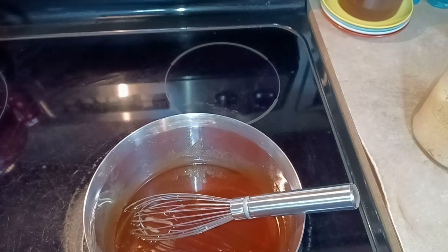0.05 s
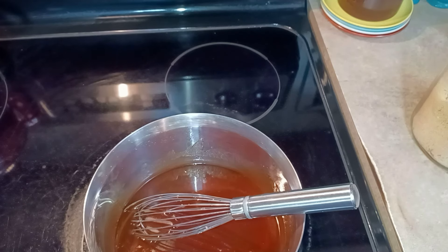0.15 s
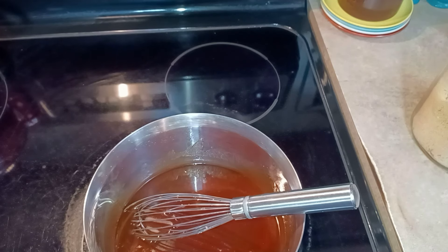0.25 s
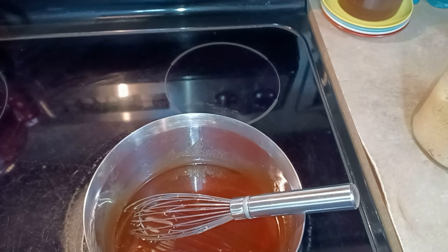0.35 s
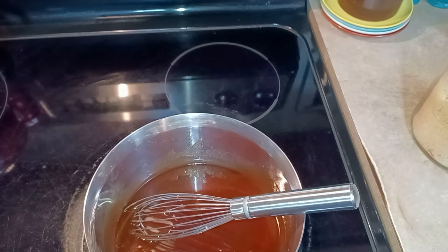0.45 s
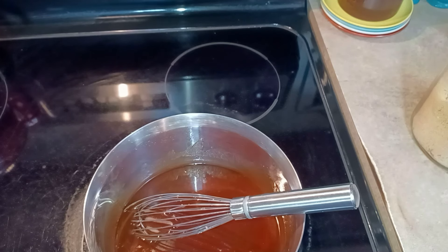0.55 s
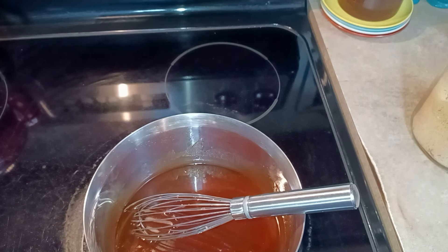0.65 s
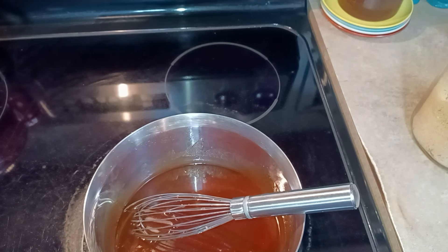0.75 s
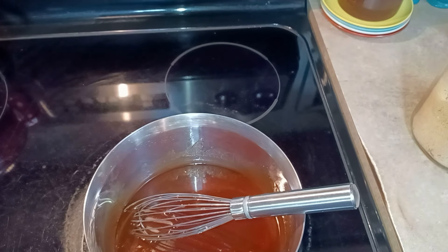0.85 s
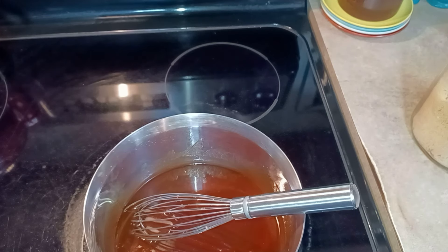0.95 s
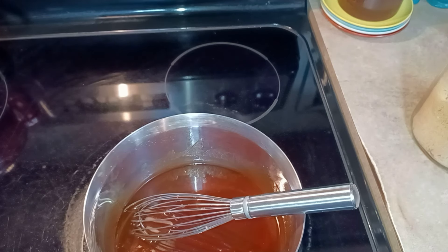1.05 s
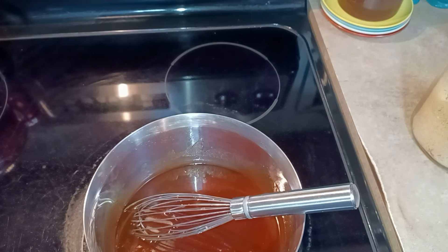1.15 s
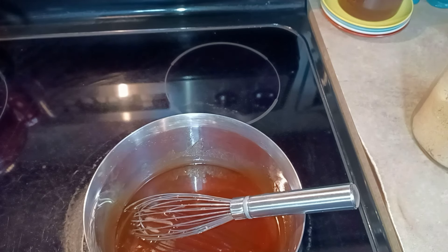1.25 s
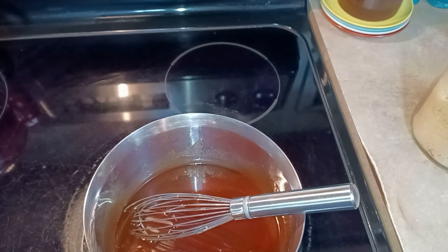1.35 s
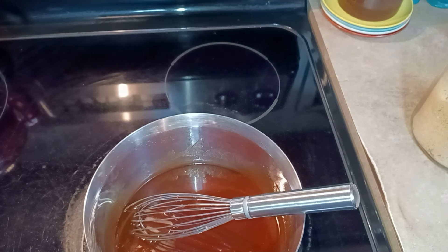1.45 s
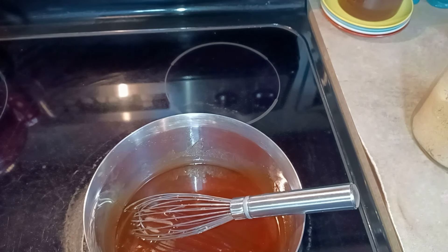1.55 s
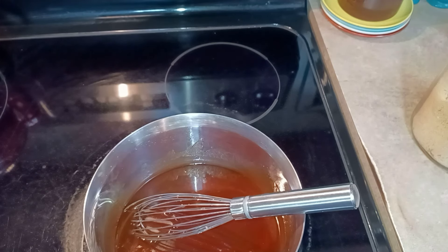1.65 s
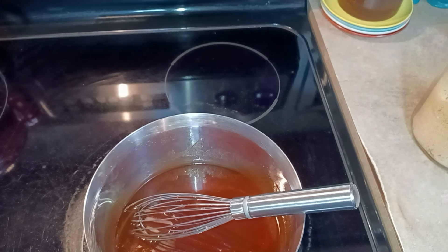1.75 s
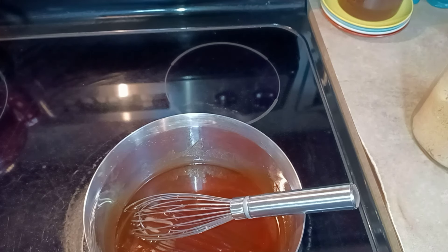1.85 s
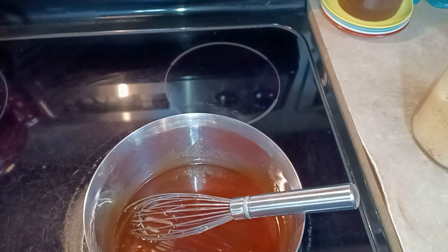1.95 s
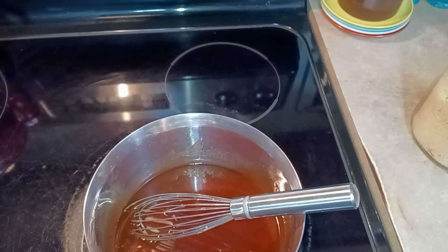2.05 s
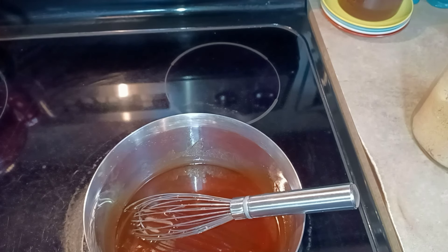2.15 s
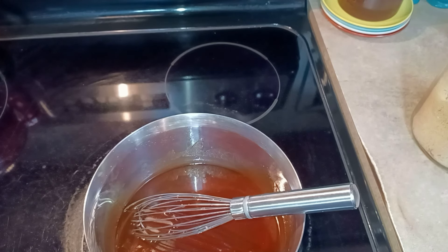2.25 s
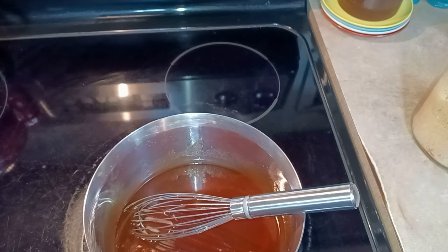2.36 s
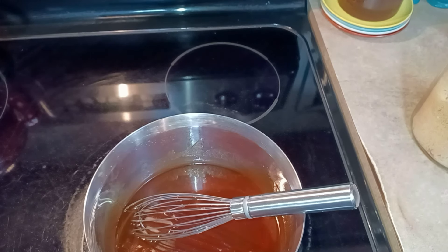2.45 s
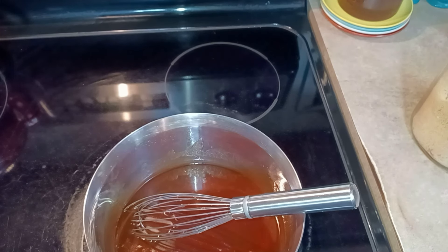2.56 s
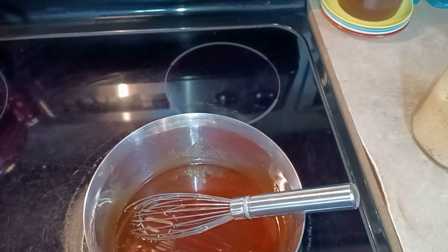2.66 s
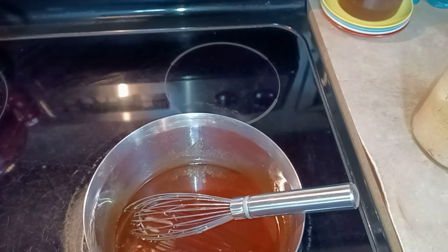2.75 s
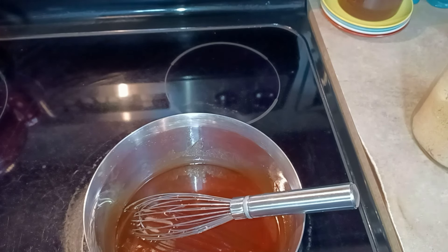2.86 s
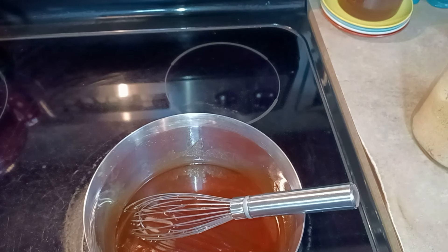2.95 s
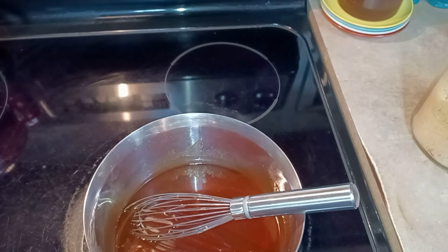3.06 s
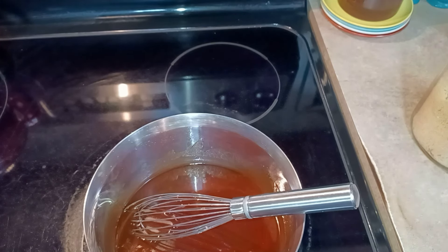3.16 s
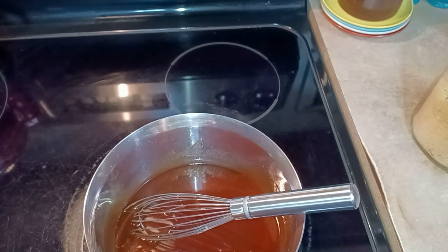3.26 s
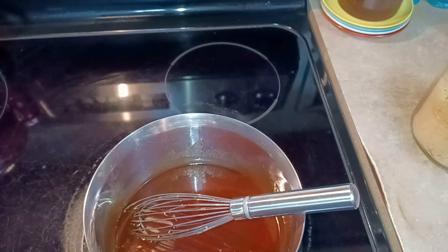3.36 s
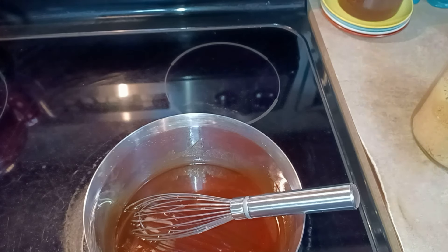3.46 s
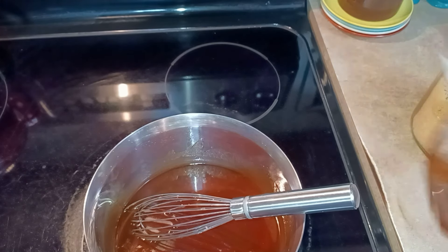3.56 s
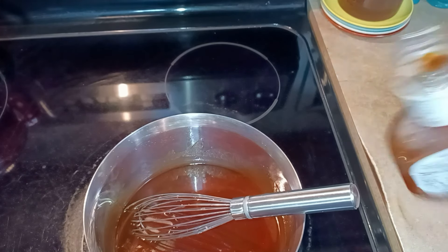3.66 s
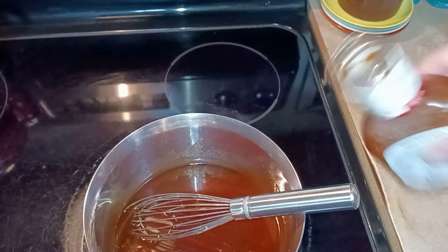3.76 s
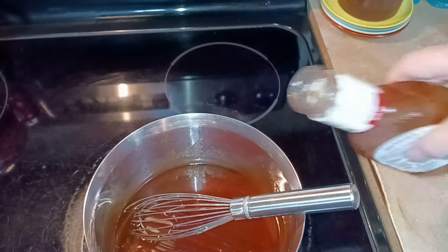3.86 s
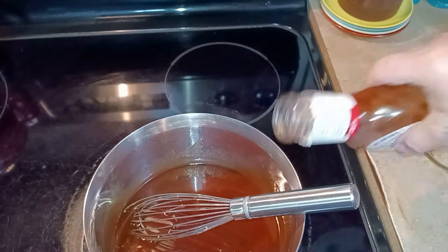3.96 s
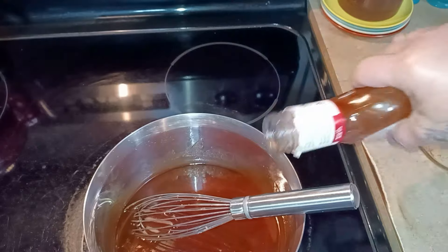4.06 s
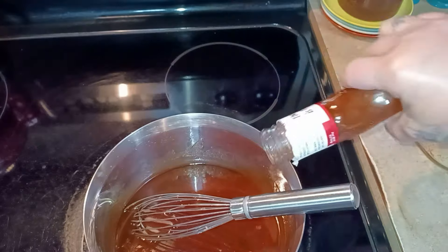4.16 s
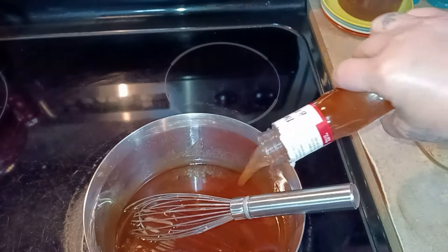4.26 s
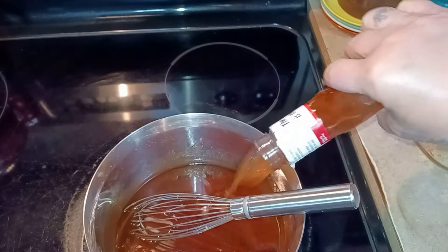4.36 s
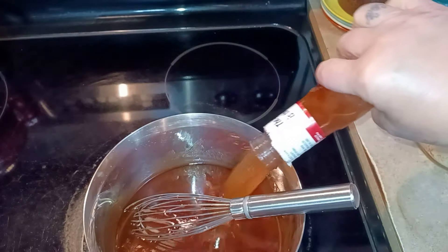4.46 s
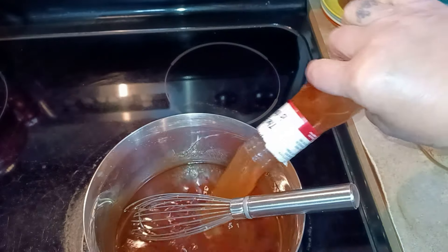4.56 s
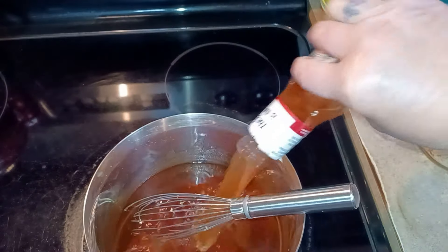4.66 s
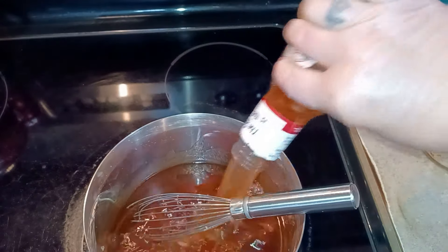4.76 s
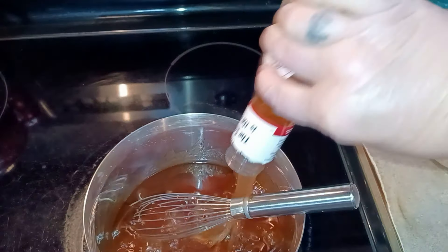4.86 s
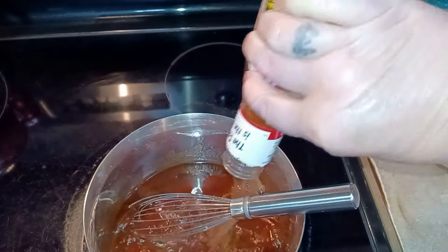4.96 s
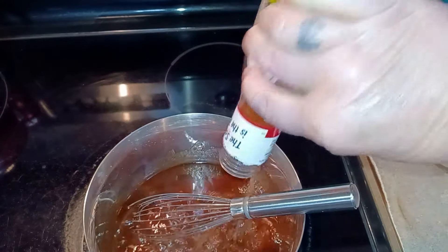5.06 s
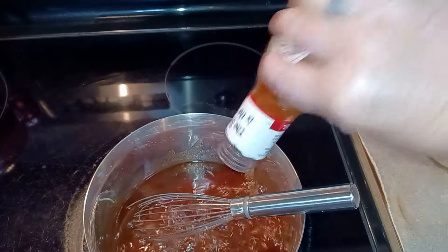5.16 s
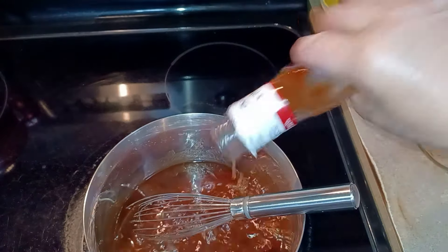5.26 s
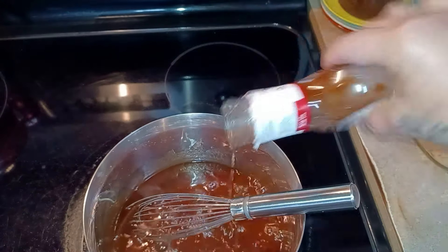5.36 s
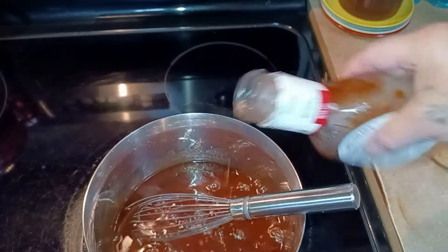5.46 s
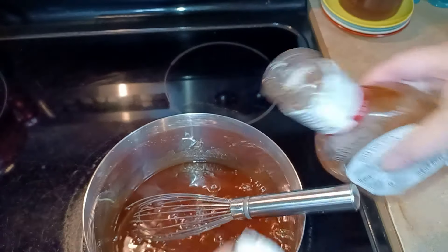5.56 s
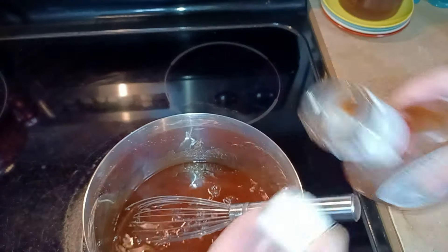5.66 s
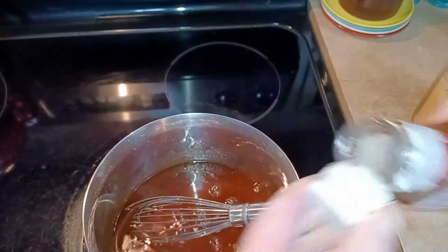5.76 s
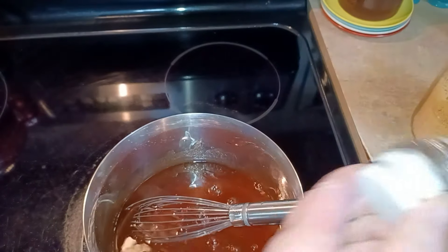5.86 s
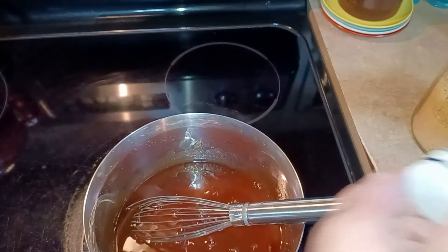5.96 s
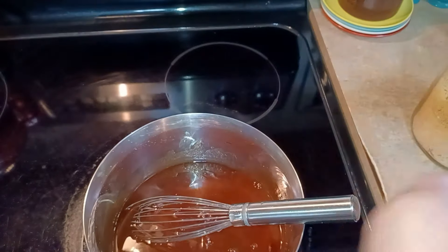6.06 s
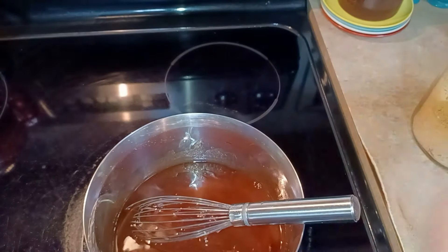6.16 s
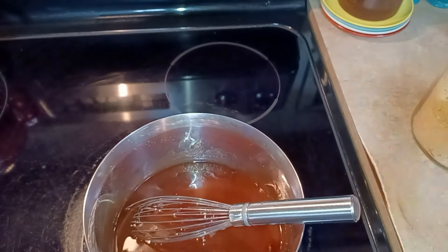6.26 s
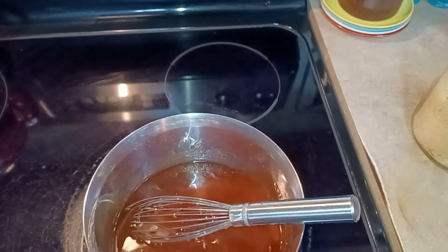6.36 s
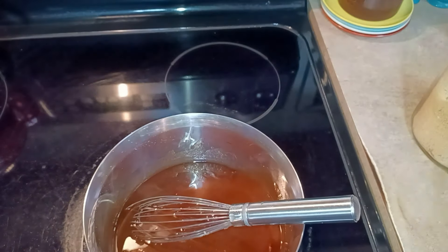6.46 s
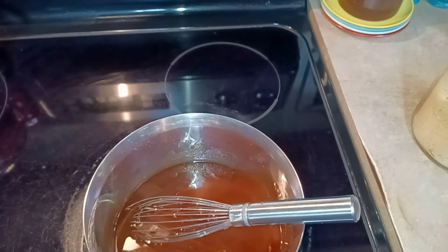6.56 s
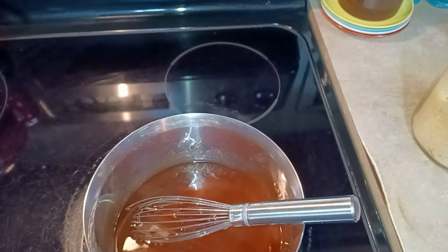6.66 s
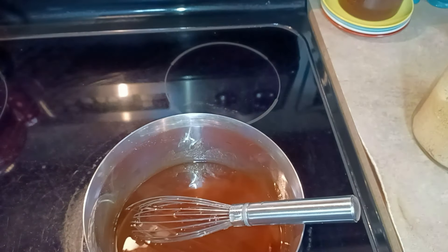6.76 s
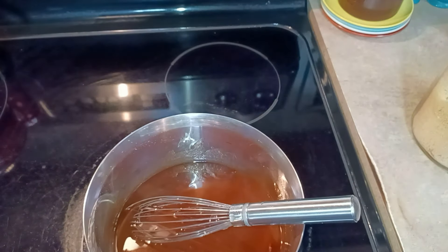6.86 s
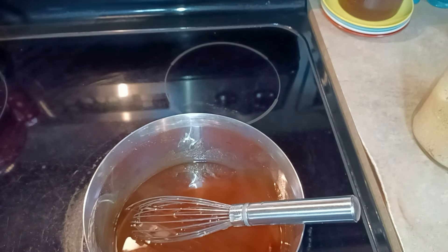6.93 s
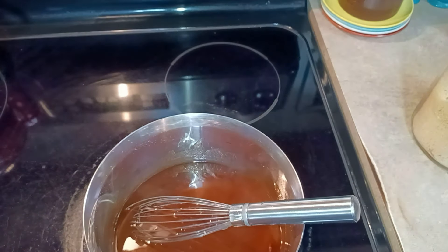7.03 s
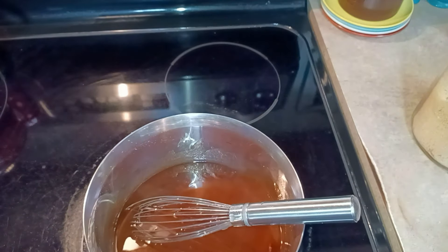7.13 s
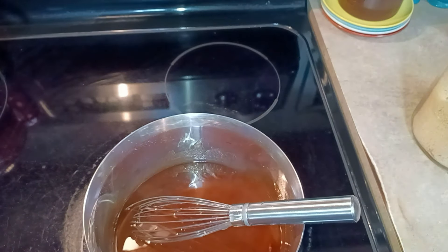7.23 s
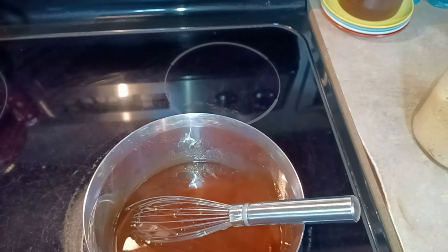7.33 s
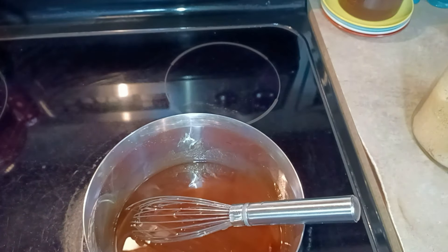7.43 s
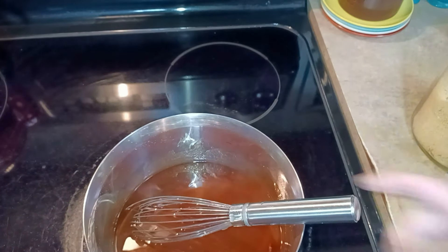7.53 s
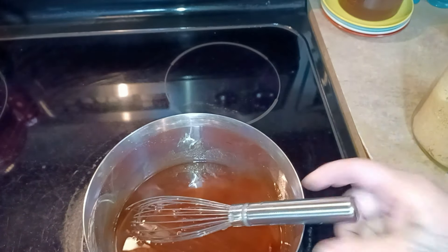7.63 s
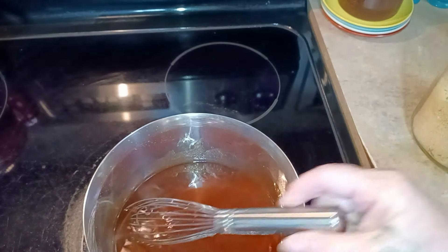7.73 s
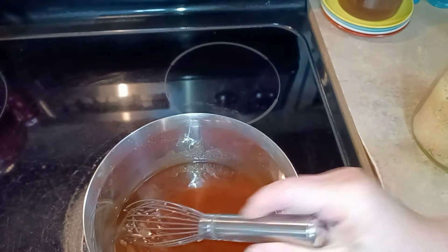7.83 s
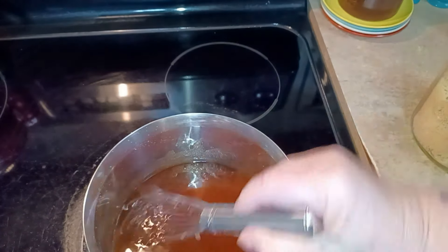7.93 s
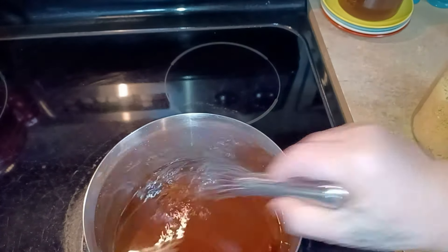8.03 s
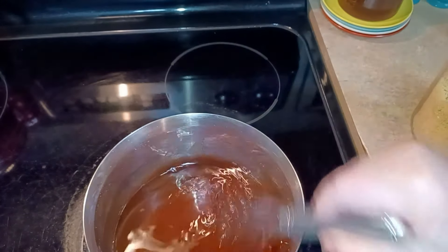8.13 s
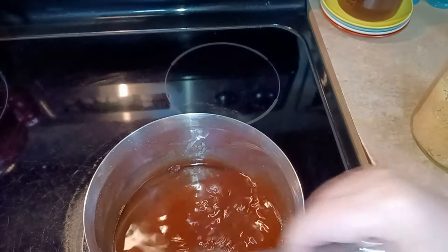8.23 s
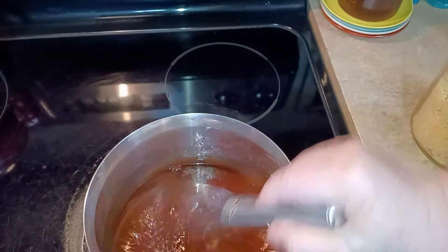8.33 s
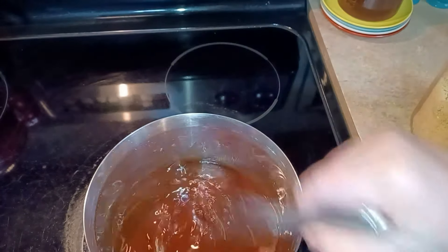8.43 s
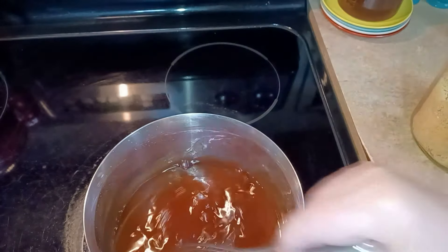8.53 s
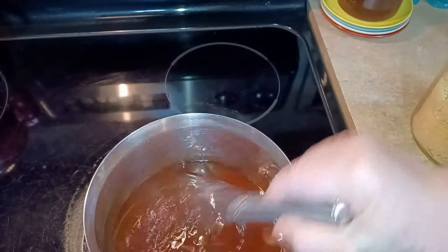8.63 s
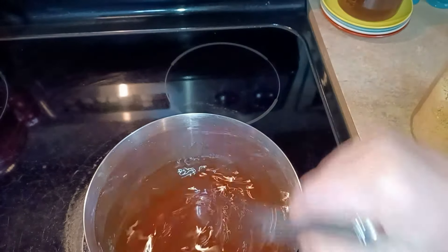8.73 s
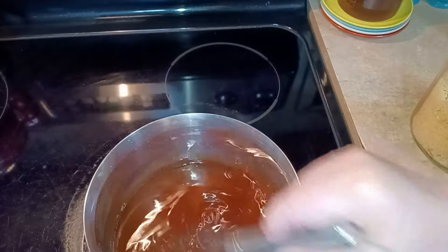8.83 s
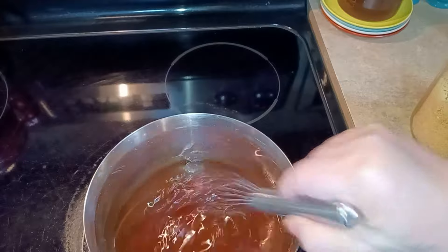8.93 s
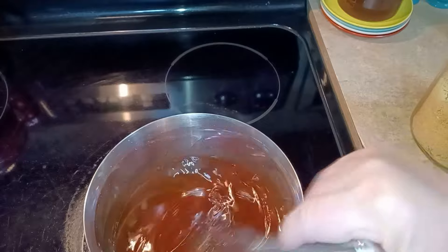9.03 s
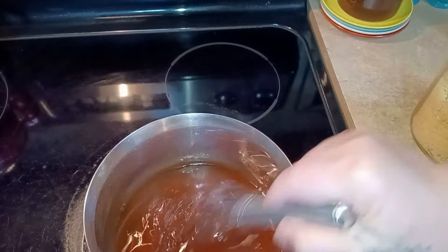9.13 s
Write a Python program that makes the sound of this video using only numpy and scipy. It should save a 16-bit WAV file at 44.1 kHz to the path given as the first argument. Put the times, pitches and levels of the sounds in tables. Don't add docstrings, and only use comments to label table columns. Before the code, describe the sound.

A low fridge drone and faint room air run throughout a small, briefly echoing kitchen, heard close and mostly left in stereo. From 0 s a thin tap trickle hisses evenly after two early spurts. At about 1 s it opens into a bright jet, growing until 1.45 s, then shuts quickly with a dull knock. Sparse drips tick until 2.6 s. Hard shaking follows to 4.1 s: swilling, hollow wet slaps, bright drops, strongest around 3.4 and 3.8 s. From 4.45 to 5.1 s liquid pours into thick-sounding sauce, more central, with plops, spatter and rising neck gulps. Cap clicks and rubs begin at 5.6 s; a solid thud lands near 6.8 s, then soft cloth brushes. From 8 s a whisk scrapes the steel pan in irregular strokes, wires pinging, dull low knocks at the turns, ending around 9.2 s.

```python
import sys
import numpy as np
from scipy import signal
from scipy.fft import rfft, irfft, next_fast_len
from scipy.io import wavfile
from scipy.ndimage import uniform_filter1d

SR = 44100
rng = np.random.default_rng(int(sys.argv[2]) if len(sys.argv) > 2 else 0)


def int16_out(signal):
    q = np.round(np.clip(np.atleast_2d(signal).T, -1, 1) * 32767)
    wavfile.write(sys.argv[1], SR, q.astype(np.int16))


def amplitude_ratio(level_db):
    exponent = np.asarray(level_db, float) / 20
    return 10 ** exponent


N = 405279
T = np.arange(N) / SR

# (frequency [Hz], correlation [-1 to 1])
PORT_LIKENESS = [(60, 0.96), (240, 0.82), (950, 0.15), (3770, -0.82), (15000, -0.05)]


def tap():
    # (time [s], level [dB])
    water_flow = [
        (0, -47.5),
        (0.2, -51),
        (0.96, -50.5),
        (1.04, -40.5),
        (1.2, -36.5),
        (1.36, -34),
        (1.44, -30.5),
        (1.52, -43.5),
        (1.7, -75.5),
    ]
    # (frequency [Hz], level [dB per Hz])
    trickle_colour = [(240, -34), (400, -2), (756, -9), (2010, 6.5), (2870, -4.5), (6040, -15.5),
                      (8760, -24.5), (15100, -15), (16300, -36.5)]
    jet_colour = [(120, -41), (200, -11), (240, -13), (796, -26), (1650, -6.5), (2890, -14.5), (3350, -9),
                  (5400, -6), (7120, 3), (8560, -2.5), (12400, 4.5), (15100, 2.5), (16300, -20)]
    # (share at -50 dB [dB], slope [dB per dB])
    trickle_tilt = (0.067, 0.19)
    jet_tilt = (2.8, 0.29)
    # (frequency [Hz], width [Hz], depth [0-1])
    sink_notches = [(2770, 290, 0.8), (4260, 350, .7), (5680, 400, .8)]
    # (time [s], peak [dB], ring [Hz], splash [dB])
    first_spurts = [
        (0.0834, -16, 7660, -13),
        (0.1197, -19.5, 4040, -1.5),
    ]
    # (ring [dB], ring per splash [dB per dB], t60 [s], shortening per peak, per ring [dB per dB])
    spurt_law = (1, -0.7, 2.6, 8.5, 0.5)

    sputter_db = 12.5 / (1 + (T / 0.061) ** 6)
    drops = spray(per_s=600, spread_db=1)
    trickle = bed(along(water_flow), trickle_tilt, trickle_colour, drops, hiss_db=sputter_db)

    streaks = shifting(spray(per_s=600, spread_db=1.5), 4.2, bins=3, frames=8)
    hz = np.fft.rfftfreq(next_fast_len(N), 1 / SR)
    notches = np.prod([1 - depth * abs(peak(hz, f, w)) ** 2 for f, w, depth in sink_notches], axis=0)
    jet = bed(along(water_flow), jet_tilt, jet_colour, streaks, notches)

    dull = signal.sosfiltfilt(signal.butter(2, 2000, fs=SR, output="sos"), jet)
    shut_db = -13 * np.clip((T - 1.407) / 0.0081, 0, 1)
    jet = dull + amplitude_ratio(shut_db) * (jet - dull)

    wide = np.clip((T - 0.97) / 0.055, 0, 1)
    flow = np.sqrt(1 - wide) * trickle + np.sqrt(wide) * jet
    return amplitude_ratio(-2.0) * flow + bursts(first_spurts, spurt_law, jet_colour, 0.18, 0.83, -10.5)


def shaking():
    # (time [s], level [dB])
    effort = [
        (1.7, -73),
        (2.0, -82.5),
        (2.55, -56.5),
        (3.0, -49.5),
        (3.2, -56.5),
        (3.4, -41.5),
        (3.8, -48),
        (4.0, -54.5),
        (4.3, -84),
    ]
    # (frequency [Hz], level [dB per Hz])
    slosh_colour = [(120, -25), (200, -13), (317, -2), (582, -18), (939, -13), (1930, -7.5), (2190, -12),
                    (6260, -14.5), (13100, -16), (16300, -15)]
    # (share at -50 dB [dB], slope [dB per dB])
    slosh_tilt = (-4.5, -0.13)
    # (time [s], peak [dB], ring [Hz], splash [dB])
    drips = [(1.6562, -48, 4470, 4.5), (1.8147, -56.5, 1190, -3), (2.065, -45, 2490, -24),
             (2.1316, -62, 2510, -47), (2.1935, -39.5, 2490, -6.5), (2.3387, -56, 1620, 13),
             (2.3853, -36, 5320, -16), (2.509, -45, 1580, -1), (2.571, -41, 5550, 2),
             (2.615, -36, 4340, -15)]
    # (time [s], peak [dB], ring [Hz], splash [dB], hold [s])
    wall_slaps = [(2.668, -31, 1500, -28, 0.021), (2.7433, -23, 1855, -52, 0.0077),
                  (2.811, -28, 3230, -16.5, 0.0067), (2.8766, -26, 4090, -6.5, 0.023),
                  (2.9218, -22, 1774, -42.5, 0.016), (2.962, -23, 2460, -35, 0.024),
                  (3.022, -21.5, 1725, -20, .02), (3.0998, -20.5, 3820, -8, 0.0079),
                  (3.107, -20, 2374, -18, 0.0094), (3.127, -23.5, 2380, -17, 0.0067),
                  (3.1718, -29, 2380, -3.5, 0.042), (3.213, -13.5, 1970, -24, 0.0092),
                  (3.2438, -14, 1590, -31, 0.0041), (3.262, -20, 1900, -8.5, 0.0066),
                  (3.304, -18, 5800, -34, 0.007), (3.323, -19, 1900, -13, 0.017),
                  (3.357, -17, 1690, -8.5, 0.013), (3.3933, -26, 1957, -10, 0.014),
                  (3.4125, -8.5, 1950, -9, 0.013), (3.468, -17, 1770, -17, 0.018),
                  (3.505, -25, 2430, -20, 0.01), (3.547, -17, 1980, -4.5, 0.018),
                  (3.664, -18.5, 2450, -9, 0.023), (3.726, -20.5, 3230, -3, 0.016),
                  (3.769, -17, 1965, -44, 0.0092), (3.7974, -7, 2020, -11.5, 0.01),
                  (3.818, -17, 1530, -23, 0.0052), (3.9127, -13.5, 1745, -26, 0.0095),
                  (3.9393, -17, 1750, -16, 0.015), (4.0421, -20, 1620, -15, 0.0048),
                  (4.0823, -26.5, 3098, -65, .008)]
    # (ring [dB], ring per splash [dB per dB], t60 [s], shortening per peak, per ring [dB per dB])
    drip_law = (1.5, -0.26, 0.13, -0.0032, -0.057)
    slap_law = (-8, 0, 0.03, 0.85, -0.2)
    # (time [s], peak [dB], centre [Hz])
    flung_drops = [(2.8439, -34, 4208), (2.8878, -27.5, 4250), (2.9297, -29, 4050), (3.0006, -31.5, 4080),
                   (3.0464, -31.5, 3900), (3.264, -25, 6630), (3.3297, -16, 4700), (3.4204, -20, 4120),
                   (3.6478, -18, 4380), (3.6626, -22, 3640), (3.7344, -21, 4230), (3.9, -53, 3970),
                   (3.9446, -19, 4980)]

    swill = spray(per_s=120, spread_db=3)
    swill += 1.5 * bubbles(effort, 1100, 6000, 400, 12, 4.5, 0.02)
    swill += 2.0 * specks(per_s=99, spread_db=8.5, t60=0.0057)
    shake = bed(along(effort), slosh_tilt, slosh_colour, swill)
    shake += bursts(drips, drip_law, slosh_colour, 0.02, 11.0, -12.5)
    shake += bursts(wall_slaps, slap_law, slosh_colour, 0.028, 9.2, -12.0)
    return shake + ticks(flung_drops, 0.018, 2.5, -9.0)


def pouring():
    # (time [s], level [dB])
    stream_level = [
        (4.42, -106),
        (4.45, -64),
        (4.55, -76),
        (4.65, -42.5),
        (4.78, -34.5),
        (4.85, -35.5),
        (5.05, -44),
        (5.11, -74),
        (5.6, -84),
    ]
    # (frequency [Hz], level [dB per Hz])
    pour_colour = [(240, -40), (400, -30.5), (710, -7.5), (924, -13), (1340, -4), (2170, -1.5), (4040, -5),
                   (12700, -10.5), (16300, -16.5)]
    # (share at -50 dB [dB], slope [dB per dB])
    pour_tilt = (0.71, -0.6)
    # (time [s], peak [dB], ring [Hz], splash [dB], hold [s])
    plops = [(4.4363, -33.5, 2070, -16, 0.015), (4.4662, -19.5, 1295, -25, 0.0048),
             (4.578, -25, 1350, -5, 0.014), (4.597, -23, 1640, -26, 0.014), (4.6239, -21, 3900, 3, 0.0022),
             (4.7436, -18, 1990, 3.5, 0.0085), (4.762, -10, 1350, -17, 0.014),
             (4.786, -7, 2090, -12, 0.0076), (4.888, -18, 1550, -24, .008), (4.9, -11, 1920, -21, 0.009),
             (4.9516, -12.5, 1880, 4.5, 0.0027), (4.965, -17, 1940, -20, 0.016),
             (5.0214, -15.5, 1170, -8, 0.0072), (5.0664, -27, 3300, 2, .005),
             (5.1372, -26.5, 3220, -3, 0.0028), (5.1936, -33, 3700, -16, .004)]
    # (ring [dB], ring per splash [dB per dB], t60 [s], shortening per peak, per ring [dB per dB])
    plop_law = (-1, 0.15, -0.08, -1, -2.1)
    # (time [s], peak [dB], centre [Hz])
    spatter = [(4.4363, -28, 4870), (4.466, -50, 9250), (4.4872, -42, 5650), (4.5261, -51, 6800),
               (4.561, -38, 4970), (4.5755, -39, 4580), (4.607, -25, 4360), (4.6239, -13.5, 3560),
               (4.6753, -18, 6170), (4.6853, -23, 6850), (4.7447, -19, 4230), (4.786, -20, 4570),
               (4.8559, -21, 5420), (4.9516, -19, 4690), (5.066, -20, 4530)]

    stream = 0.65 * spray(per_s=300, spread_db=3.5)
    stream += 0.85 * bubbles(stream_level, 900, 5000, 500, 11, 4.5, 0.07)
    stream += 0.55 * specks(per_s=80, spread_db=3, t60=0.012)
    pour = bed(along(stream_level), pour_tilt, pour_colour, stream)
    pour += neck() * amplitude_ratio(-5) + gulps()
    pour += bursts(plops, plop_law, pour_colour, 0.14, 5.5, -15.5)
    return pour + ticks(spatter, 0.016, 3.8, -5.5)


def neck():
    # (time [s], frequency [Hz], level [dB])
    neck_air = [(4.6, 500, -63), (4.65, 544, -37), (4.7, 650, -46), (4.73, 816, -30), (4.8, 750, -38.5),
                (4.9, 730, -35), (5.0, 753, -32), (5.05, 760, -48.5), (5.1, 720, -80)]
    gate, (hz, db) = along(neck_air)
    wobble = 1 + 0.072 * evened(uniform_filter1d(rng.standard_normal(N), size=600))
    turn = np.exp(2j * np.pi * np.cumsum(hz * wobble) / SR)
    r = np.exp(-np.pi * 130 / SR)
    puffs = spray(per_s=200, spread_db=6) / turn
    ring = turn * signal.lfilter([1], [1, -2 * r, r * r], puffs)
    return gate * amplitude_ratio(db) * evened(ring.real)


def gulps():
    # (time [s], peak [dB], start pitch [Hz], length [cycles])
    large_bubbles = [(4.443, -40, 1510, 17), (4.485, -33, 2360, 13), (4.529, -43, 1350, 7.9),
                     (4.582, -33, 1250, 24), (4.6, -24, 1404, 16), (4.64, -24, 2200, 13),
                     (4.676, -21.5, 1390, 12), (4.757, -14, 1900, 17), (4.775, -17, 1286, 16),
                     (4.79, -16, 2140, 18), (4.879, -23, 2560, 14), (4.906, -22, 1470, 15),
                     (4.965, -20, 1485, 14), (5.003, -25.5, 1330, 18), (5.022, -28, 955, 7.4),
                     (5.04, -31, 1910, 12)]
    out = np.zeros(N)
    for s, db, hz, cycles in large_bubbles:
        t = np.arange(round(2 * cycles * SR / hz)) / SR
        u = t * hz / cycles
        note = np.sin(2 * np.pi * hz * t * (1 + 0.211 * u))
        add(out, s, amplitude_ratio(db + 12.0) * note * u * np.exp(-4 * u))
    return out


def hands():
    # (start [s], hold [s], level [dB])
    rubs = [
        (5.63, 0.062, -49.5),
        (5.92, 0.0033, -49.5),
        (6.04, 0.015, -46),
        (6.08, 0.0033, -44.5),
        (6.26, 0.19, -48.5),
        (6.64, 0.11, -68.5),
        (6.9, 0.025, -42),
        (7.59, 0.058, -56),
    ]
    rub_span = [(5.63,), (7.97,)]
    # (frequency [Hz], level [dB per Hz])
    rub_colour = [(60, -27), (180, -15), (300, -1), (405, -5.5), (539, -9.5), (692, -5), (1890, -3.5),
                  (16300, -36)]
    # (share at -50 dB [dB], slope [dB per dB])
    rub_tilt = (-13, -0.52)
    # (time [s], peak [dB], ring [Hz], snap [dB], hold [s])
    cap_clicks = [(5.624, -21.5, 1220, -23, 0.0063), (5.885, -33.5, 2080, -49, 0.011),
                  (5.9405, -22, 1930, -22, 0.0032), (6.034, -27.5, 1880, -22, 0.027),
                  (6.077, -19.5, 2500, -22, 0.0066), (6.395, -32.5, 2040, -36, 0.0063),
                  (6.823, -24.5, 2400, -16, 0.011), (6.867, -18, 2000, -22, 0.0072),
                  (6.935, -30, 2260, -18, 0.0093), (7.814, -47, 1560, -10, 0.0041)]
    # (ring [dB], ring per snap [dB per dB], t60 [s], shortening per peak, per ring [dB per dB])
    click_law = (-4.3, 0.27, 0.0054, 0.13, -0.34)
    # (time [s], peak [dB], centre [Hz])
    cap_snaps = [(5.6236, -24.5, 3620), (5.876, -35, 6900), (5.9409, -33, 5950), (6.2018, -50.5, 3530),
                 (6.8234, -28.5, 5490), (6.8673, -34, 5300), (7.1127, -54, 7220), (7.207, -53, 12250),
                 (7.452, -49, 10500), (7.8126, -48, 6380)]

    rubbing = shifting(spray(per_s=200, spread_db=2), 2.5, bins=8, frames=4)
    control = strokes(rubs, rub_span, rise_db_s=397, fall_db_s=216, rest_db=-76)
    sleeve_db = -9.5 * (T > 6.9)
    out = amplitude_ratio(-2.0) * bed(control, rub_tilt, rub_colour, rubbing, hiss_db=sleeve_db)
    out += bursts(cap_clicks, click_law, rub_colour, 0.013, 6.9, -5.5)
    return out + ticks(cap_snaps, 0.016, 1.3, -3.0)


def whisk():
    # (start [s], hold [s], level [dB])
    whisk_strokes = [
        (7.99, 0.099, -46.5),
        (8.23, 0.01, -46),
        (8.46, 0.11, -46),
        (8.68, 0.014, -43),
        (8.84, 0.0022, -45.5),
        (8.96, 0.0033, -42),
        (9.08, 0.0059, -38.5),
        (9.18, .02, -49),
    ]
    whisk_span = [(7.99,), (9.19,)]
    # (frequency [Hz], level [dB per Hz])
    scrape_colour = [(60, -6), (180, 3.5), (300, -2.5), (566, -17.5), (818, -16.5), (967, -10),
                     (2910, -5.5), (3940, -6.5), (13800, 4.5), (16300, -5.5)]
    # (share at -50 dB [dB], slope [dB per dB])
    scrape_tilt = (-0.33, -0.12)
    # (frequency [Hz], width [Hz], level [dB])
    pan_rings = [(816, 15, -4), (3050, 60, -60), (4840, 29, -35), (6060, 97, -25)]
    # (time [s], peak [dB], ring [Hz], snap [dB], hold [s])
    wire_hits = [(7.9844, -27, 7900, -2.5, 0.0092), (8.208, -32, 2430, -2.5, 0.0084),
                 (8.346, -21, 6240, -5.5, 0.0047), (8.47, -46, 1370, -26, 0.011),
                 (8.4993, -36, 3200, -23, 0.0043), (8.535, -27, 2340, -13, 0.0082),
                 (8.621, -15.5, 4170, -7, 0.0065), (8.72, -18.5, 3010, -21.5, 0.002),
                 (8.8065, -30.5, 1520, -2.5, 0.006), (8.825, -40.5, 824, -37, 0.017),
                 (8.902, -16, 6040, -9, 0.0053), (8.952, -28.5, 2500, -7, .008),
                 (9.0348, -34, 1920, -25, 0.0035), (9.0967, -37, 2050, -30, 0.0037),
                 (9.157, -13, 3190, -1.5, 0.0095)]
    # (ring [dB], ring per snap [dB per dB], t60 [s], shortening per peak, per ring [dB per dB])
    wire_law = (-12, -.55, 0.13, 0.37, 0.3)

    hz = np.fft.rfftfreq(next_fast_len(N), 1 / SR)
    rings = 0.11 + sum(amplitude_ratio(db + 18.0) * abs(peak(hz, f, w)) for f, w, db in pan_rings)
    pings = bubbles(whisk_span, 2000, 14000, 500, 110, 2, 0.001)
    pings += 0.45 * bubbles(whisk_span, 800, 3500, 60, 16, 3, 0.1)
    drag = shifting(spray(per_s=500, spread_db=2) + 0.7 * pings, 4.5, bins=2, frames=6)
    control = strokes(whisk_strokes, whisk_span, rise_db_s=220, fall_db_s=220, rest_db=-58)
    scrape = bed(control, scrape_tilt, scrape_colour, drag, rings)
    return scrape + bursts(wire_hits, wire_law, scrape_colour, 0.011, 7.7, -12.0)


def knocks():
    # (time [s], peak [dB], body [Hz], second body [Hz], its share [dB])
    bottle_knocks = [(0.13, -37.5, 240, 544, 5), (1.019, -40.5, 245, 570, 2.5), (4.189, -37, 320, 570, -8),
                     (1.5, -24.5, 127, 527, -7.5), (3.03, -20, 280, 450, -2.5), (3.42, -28, 243, 376, -22),
                     (3.657, -18, 300, 353, 0), (3.797, -22.5, 360, 330, -17), (5.624, -18.5, 241, 315, -7),
                     (5.94, -35, 255, 494, -2), (6.051, -30, 245, 360, -23), (6.824, -15.5, 212, 511, -5),
                     (6.864, -22.5, 143, 709, -0.5), (6.939, -31.5, 146, 720, 2),
                     (7.694, -34, 138, 370, -12.5), (6.687, -41, 315, 510, -1), (7.59, -49.5, 360, 914, 4),
                     (5.637, -20, 224, 324, -3), (0.175, -41.5, 244, 570, 3), (6.73, -44, 320, 600, 0.5)]
    # (time [s], peak [dB], body [Hz])
    pan_knocks = [
        (7.987, -27.5, 139),
        (8.355, -25, 187),
        (8.63, -30, 183),
        (8.911, -23, 170),
        (9.163, -18.5, 159),
    ]
    out, t = np.zeros(N), np.arange(12000) / SR
    blows = [(*row, 0.036 / amplitude_ratio(0.25 * (row[1] + 17.5))) for row in bottle_knocks]
    blows += [(*row, 826, -27.5, 0.081) for row in pan_knocks]
    rattles = rng.standard_normal((len(blows), 12000))
    for (s, db, hz, upper_hz, upper_db, t60), rattle in zip(blows, rattles):
        rattle = 0.9 + 0.7 * evened(uniform_filter1d(rattle, size=130))
        upper = rattle * np.sin(2 * np.pi * upper_hz * t)
        modes = np.sin(2 * np.pi * hz * t) + amplitude_ratio(upper_db) * upper
        swell = 1 - np.exp(-t * hz ** 2 / 220)
        shape = swell * amplitude_ratio(-60 * t / max(t60, 0.01) * np.tanh(t / 0.018))
        add(out, s, amplitude_ratio(db - 1.0) * modes * shape / shape.max())
    return out


def bed(control, tilt, colour, drive, rings=1, hiss_db=0):
    gate, (db,) = control
    treble_db = tilt[0] + tilt[1] * (db + 50) + hiss_db
    size = next_fast_len(N)
    hz, z = np.fft.rfftfreq(size, 1 / SR), rfft(drive * gate, size)
    z = z / np.sqrt(uniform_filter1d(abs(z) ** 2, size=8000))
    z = z * amplitude_ratio(read(colour, hz)) * rings
    treble = 1 / (1 + (5000 / (hz + 1)) ** 6)
    body, top = (evened(irfft(z * m, size)[:N]) * np.sqrt(gate.mean()) for m in (1 - treble, treble))
    return gate * amplitude_ratio(db) * (body + amplitude_ratio(treble_db) * top)


def bursts(rows, law, colour, rise, sharpness, lift_db):
    out, t, hz = np.zeros(N), np.arange(8192) / SR, np.fft.rfftfreq(8192, 1 / SR)
    treble = 1 / (1 + (6000 / (hz + 1)) ** 6)
    noises = rng.standard_normal((len(rows), 2, 8192))
    for (s, db, ring_hz, treble_db, *hold), (puff, rag) in zip(rows, noises):
        ring_db = law[0] + law[1] * treble_db
        t60 = max(law[2] / amplitude_ratio(law[3] * (db + 23) + law[4] * ring_db), 0.005)
        hold = max(sum(hold), 0)
        z, u = rfft(puff), np.maximum(t - hold, 0) / t60
        body, top = (evened(irfft(z * amplitude_ratio(read(colour, hz)) * m)) for m in (1 - treble, treble))
        ring = evened(irfft(z * peak(hz, ring_hz, ring_hz / sharpness) ** 2))
        swell = np.tanh(t / (rise * t60 + 0.08 * hold))
        shape = swell * amplitude_ratio(-60 * u * np.tanh(2.5 * u))
        ragged = amplitude_ratio(3 * evened(uniform_filter1d(rag, size=200)))
        puff = (0.5 * body + amplitude_ratio(treble_db) * top) * ragged
        puff = puff + amplitude_ratio(ring_db) * ring * amplitude_ratio(-22 * u)
        add(out, s, amplitude_ratio(db + lift_db) * shape * puff)
    return out


def ticks(rows, t60, sharpness, lift_db):
    out, t, hz = np.zeros(N), np.arange(1024) / SR, np.fft.rfftfreq(1024, 1 / SR)
    for (s, db, centre_hz), noise in zip(rows, rng.standard_normal((len(rows), 1024))):
        colour = 0.27 + abs(peak(hz, centre_hz, centre_hz / sharpness))
        colour = colour / (1 + (2500 / (hz + 1)) ** 4)
        shape = amplitude_ratio(db + lift_db - 60 * t / max(t60, 0.003)) * np.tanh(t / 0.00068)
        add(out, s, shape * evened(irfft(rfft(noise) * colour)))
    return out


def bubbles(span, low_hz, high_hz, per_s, cycles, spread_db, glide):
    out = np.zeros(N)
    start, length = span[0][0], span[-1][0] - span[0][0]
    for when, pitch, size in rng.random((round(per_s * length), 3)):
        hz = low_hz * (high_hz / low_hz) ** pitch
        t = np.arange(round(3 * cycles * SR / hz)) / SR
        u = t * hz / cycles
        tone = np.sin(2 * np.pi * hz * t * (1 + glide * u)) * u * np.exp(-3 * u)
        size_db = -spread_db * np.log(size + 0.013)
        add(out, start + when * length, amplitude_ratio(size_db) * tone / np.linalg.norm(tone))
    return out / np.sqrt(per_s / SR) / amplitude_ratio(0.62 * spread_db)


def spray(per_s, spread_db):
    jumps = rng.standard_normal(N)
    jumps = evened(signal.lfilter([1], [1, -np.exp(-per_s / SR)], jumps))
    return amplitude_ratio(spread_db * jumps) * rng.standard_normal(N)


def specks(per_s, spread_db, t60):
    t = np.arange(600) / SR
    hits = (rng.random(N) < per_s / SR) * amplitude_ratio(spread_db * rng.standard_normal(N))
    return evened(signal.oaconvolve(hits, amplitude_ratio(-60 * t / t60))[:N] * rng.standard_normal(N))


def shifting(x, depth_db, bins, frames):
    z = signal.stft(x, nperseg=512)[2]
    patches = rng.standard_normal(z.shape)
    for _ in range(2):
        patches = uniform_filter1d(uniform_filter1d(patches, bins, 0), frames, 1)
    return evened(signal.istft(z * amplitude_ratio(depth_db * evened(patches)), nperseg=512)[1][:N])


def strokes(rows, span, rise_db_s, fall_db_s, rest_db):
    power = amplitude_ratio(2 * rest_db)
    for s, hold, db in rows:
        rise = rise_db_s * np.maximum(s - T, 0)
        fall = fall_db_s * np.maximum(T - s - hold, 0)
        power = power + amplitude_ratio(2 * (db - rise - fall))
    return along(span)[0], [10 * np.log10(power)]


def along(rows):
    s, *columns = np.transpose(rows)
    gate = uniform_filter1d(1. * (T >= s[0]) * (T <= s[-1]), size=200)
    return gate, [np.interp(T, s, c) for c in columns]


def evened(x):
    return x / np.sqrt(np.mean(x ** 2) + 1e-20)


def read(points, hz):
    f, value = np.transpose(points)
    return np.interp(np.log(hz + 1), np.log(f + 1), value)


def peak(hz, centre_hz, width_hz):
    return 1 / (1 + 2j * (hz - centre_hz) / width_hz)


def add(mix, s, sound):
    part = mix[round(s * SR):][:len(sound)]
    part += sound[:len(part)]


def ports(x, count, lean_db):
    pair = np.array([np.roll(x, -(count // 2)), np.roll(x, count - count // 2)])
    return pair * amplitude_ratio([[lean_db / 2], [-lean_db / 2]])


def room(x):
    turns = [np.sqrt(2 / 3) * np.cos(2 * np.pi * (3 * T + k / 3)) for k in range(3)]
    return sum(signal.oaconvolve((x * turn)[None], echoes(), axes=1)[:, :N] for turn in turns)


def echoes():
    # (frequency [Hz], t60 [s])
    decay = [(100, 0.43), (500, 0.29), (2000, 0.14), (8000, 0.15), (16000, 0.17)]
    taps = np.zeros((2, SR // 3))
    at = np.arange(100, SR // 3 - 20, 20) + rng.integers(0, 20, (2, (SR // 3 - 101) // 20))
    np.put_along_axis(taps, at, rng.choice([-1., 1.], at.shape), 1)
    hz, t, (left, other) = signal.stft(taps, SR, nperseg=256)
    same = np.clip(read(PORT_LIKENESS, hz), 0, 1)[:, None]
    z = np.array([left, same * left + np.sqrt(1 - same ** 2) * other])
    tail = signal.istft(z * amplitude_ratio(-60 * t / read(decay, hz)[:, None]), SR, nperseg=256)[1]
    return tail / np.linalg.norm(tail[0])


def drone():
    # (frequency [Hz], level [dB per Hz])
    drone_colour = [(24, -44), (40, -21), (85, -13.5), (101, -13), (124, 1.5), (172, -22.5), (245, -6),
                    (447, -23.5), (927, -35.5), (1050, -34.5), (9610, -52), (14000, -49), (16300, -65.5)]
    size = next_fast_len(N)
    hz = np.fft.rfftfreq(size, 1 / SR)
    left, other = rfft(rng.standard_normal((2, size)))
    same = np.clip(read(PORT_LIKENESS, hz), -1, 1)
    motor = 1 + amplitude_ratio(-10.0) * abs(peak(hz, 100.0, 1.4)) ** 2
    pair = np.array([left, same * left + np.sqrt(1 - same ** 2) * other])
    z = pair * amplitude_ratio(read(drone_colour, hz)) * motor
    return amplitude_ratio(-47.6) * evened(irfft(z, size)[:, :N]) * amplitude_ratio([[0.6], [-0.6]])


def scene():
    water, shake, pour = tap(), shaking(), pouring()
    handling, stir, thuds = hands(), whisk(), knocks()
    direct = ports(water, count=11, lean_db=6.5) + ports(shake, count=20, lean_db=8.5)
    direct += ports(pour, count=2, lean_db=-1.0) + ports(handling, count=17, lean_db=9.5)
    direct += ports(stir, count=0, lean_db=3.6) + ports(thuds, count=10, lean_db=3.0)
    sends = amplitude_ratio(4.0) * water + amplitude_ratio(-0.5) * shake + amplitude_ratio(-3.0) * (pour + stir)
    sends += amplitude_ratio(-2.0) * handling + amplitude_ratio(-7.0) * thuds
    return direct + room(sends) * amplitude_ratio([[1.7], [0.2]]) + drone()


def roll_off(x):
    return signal.sosfilt(signal.butter(12, 16790, fs=SR, output="sos"), x)


def record(dry):
    dry = signal.sosfilt(signal.butter(6, 50, "high", fs=SR, output="sos"), dry)
    edge = signal.firwin(255, 16100, window=("kaiser", 8), fs=SR)
    mix = signal.oaconvolve(dry, edge[None], "same", axes=1)
    return roll_off(mix)


dry = scene()
out = record(dry)
int16_out(out)
```